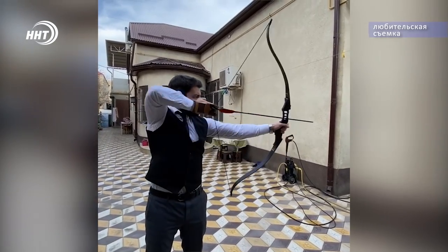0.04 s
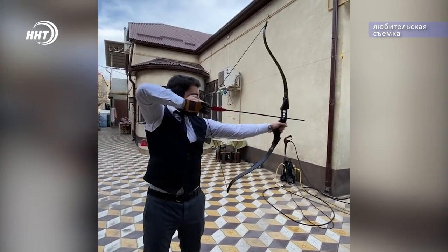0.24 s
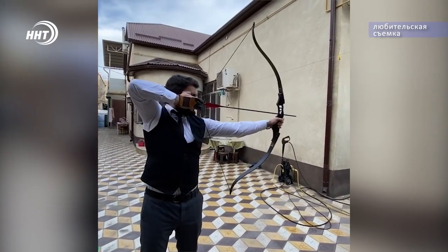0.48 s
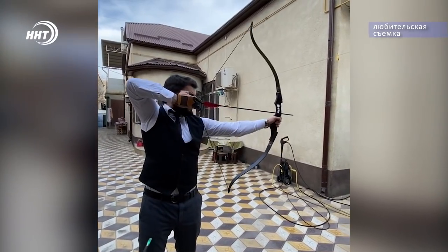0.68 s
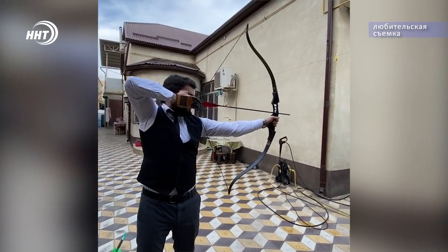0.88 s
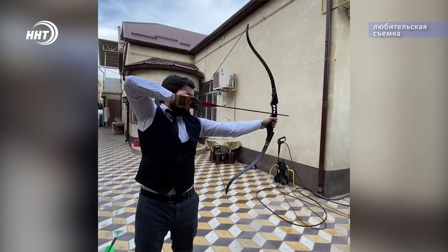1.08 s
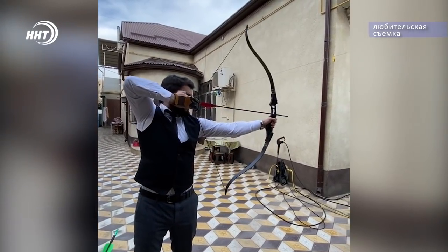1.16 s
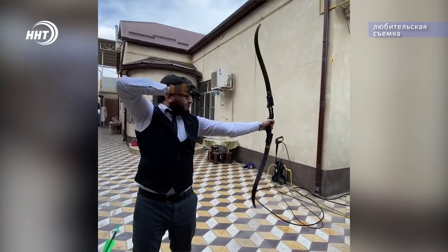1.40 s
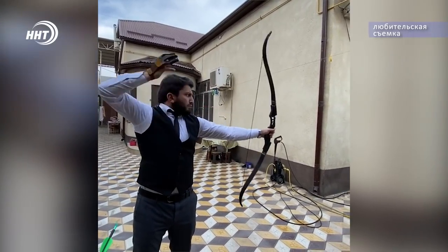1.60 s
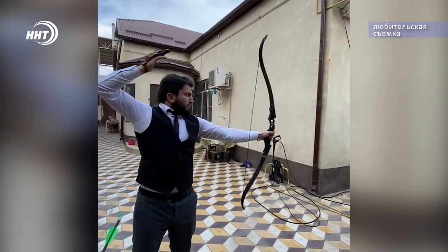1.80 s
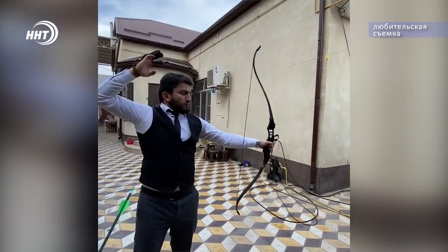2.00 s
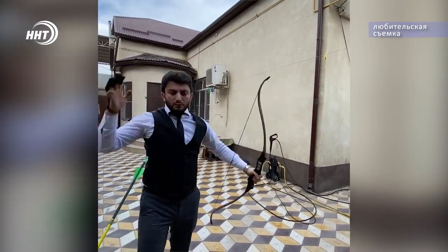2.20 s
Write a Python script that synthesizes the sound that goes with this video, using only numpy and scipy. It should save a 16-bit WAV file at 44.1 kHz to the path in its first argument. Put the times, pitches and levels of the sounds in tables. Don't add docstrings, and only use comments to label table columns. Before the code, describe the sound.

After a near-silent second of faint cloth rustle and tiny ticks, a bowstring hisses and slaps, an arrow knocks a hollow target, and walls throw it back over a low string hum; close microphone, paved yard.

```python
import sys
import numpy as np
from scipy import signal
from scipy.fft import rfft, irfft
from scipy.io import wavfile
from scipy.ndimage import uniform_filter1d

SR = 44100
rng = np.random.default_rng(int(sys.argv[2]) if len(sys.argv) > 2 else 0)


def master(y):
    cut = np.clip(np.atleast_2d(y).T, -1, 1)
    pcm = np.round(cut * 32767)
    wavfile.write(sys.argv[1], SR, pcm.astype(np.int16))


def volts(x):
    e = np.asarray(x, float) / 20
    return 10 ** e


N = 99180
T = np.arange(N) / SR
SIDE = np.array([[.5], [-.5]])
STRIKE_S = 1.3574


def evened(x):
    return x / np.sqrt(np.mean(x ** 2) + 1e-20)


def smooth(x, size):
    return uniform_filter1d(x, size=size)


def read(points, hz):
    f, value = np.transpose(points)
    return np.interp(np.log(hz + 1), np.log(f + 1), value)


def level(points):
    s, db = np.transpose(points)
    return volts(np.interp(T, s, db, left=-140, right=-140))


def resonate(x, hz, width_hz):
    turn = np.exp(2j * np.pi * hz * np.arange(x.shape[-1]) / SR)
    r = np.exp(-np.pi * width_hz / SR)
    return 2 * (turn * signal.lfilter([(1 - r) ** 2], [1, -2 * r, r * r], x / turn)).real


# pitch_hz, correlation
LIKENESS = [(60, 0.92), (250, 0.81), (600, 0.052), (1500, 0.59), (2300, -0.0014), (3200, -0.38),
            (8500, 0.13), (10500, 0.37), (13500, 0.12)]
# pitch_hz, left_minus_right_db
BALANCE = [(110, 0), (250, -6), (600, 2), (2000, -3.5), (4500, 5), (11000, -2.5)]


def paired(z, other, hz):
    same = np.clip(read(LIKENESS, hz), -1, 1)[:, None]
    half = volts(read(BALANCE, hz) / 2)[:, None]
    right = same * z + np.sqrt(1 - same ** 2) * other
    return np.array([half * z, right / half])


def hiss(tone, patchy_db):
    frames, hz = N // 128 + 5, np.fft.rfftfreq(512, 1 / SR)
    a, b, c, d, patch = rng.standard_normal((frames, 257, 5)).T
    patch = uniform_filter1d(patch, size=8, axis=0)
    patch = evened(uniform_filter1d(patch, size=12, axis=1))
    gain = volts(read(tone, hz)[:, None] + patchy_db * patch)
    z = paired(a + 1j * b, c + 1j * d, hz) * gain
    return evened(signal.istft(z, nperseg=512, noverlap=384)[1][:, :N])


def strike(hits, modes):
    out, t = np.zeros((2, N)), T[:SR // 2]
    for s, db in hits:
        at = round(s * SR)
        chances = 2 * rng.standard_normal((len(modes), 2))
        for (hz, mode_db, t60, pan_db, lead), (chance_db, chance_pan_db) in zip(modes, chances):
            lean_db = SIDE * (pan_db + chance_pan_db)
            fade = volts(db + mode_db + chance_db + lean_db - 60 * t / t60)
            ring = np.sin(2 * np.pi * hz * t + SIDE * lead)
            out[:, at:at + len(t)] += np.minimum(t * hz, 1) * fade * ring
    return out


def chirp(rows, pan_db):
    out = np.zeros((2, N))
    for s, length, hz, glide, db in rows:
        u = np.clip((T - s) / length, 0, 1)
        lean = volts(db + pan_db * (hz > 1000) * SIDE)
        cycles = length * hz * u * (1 + (glide - 1) * u / 2)
        out += lean * np.sin(np.pi * u) * np.sin(2 * np.pi * cycles)
    return out


# start_s, level_db
STRING_RUSH = [
    (1.168, -40),
    (1.1705, -30),
    (1.178, -32),
    (1.197, -26),
    (1.205, -17.5),
    (1.225, -16.5),
    (1.245, -26),
    (1.3, -35.5),
    (1.35, -63),
]
# pitch_hz, density_db_per_hz
STRING_TONE = [(180, -49.5), (300, -8.5), (492, -9), (553, -22.5), (744, -5.5), (1090, -6.5), (3280, -3.5),
               (10800, -19), (15500, -27.5)]
# start_s, level_db
STRING_SLAPS = [
    (1.2045, -16.5),
    (1.2095, -33.5),
    (1.2165, -14.5),
    (1.2215, -13),
    (1.235, -38.5),
    (1.253, -33),
    (1.268, -33),
]
# pitch_hz, level_db, t60_s, left_minus_right_db, left_lead_rad
BOW_MODES = [(196, -2.5, 0.09, -0.5, 0.6), (275.2, 1, 0.11, -7.5, 0.9), (494, 0.5, 0.15, 1, 5),
             (632, -8.5, 0.054, -2, -0.5), (747, -3.5, 0.095, 3.5, 1), (989, -7.5, 0.085, -1.5, 1.5),
             (1622, -12, 0.13, 0.5, 2), (2130, -4, 0.088, -8.5, 2), (2770, -14, 0.0067, 6, 6),
             (5850, -25.5, 0.18, -1.5, -3)]
# start_s, length_s, pitch_hz, glide_ratio, level_db
NOCK_TONES = [
    (1.198, .008, 3230, 1.02, -15),
    (1.2035, .016, 245, .95, -16),
    (1.262, .03, 115, .95, -32),
    (1.235, .07, 155, .95, -27),
    (1.271, .009, 265, .95, -19),
    (1.297, .01, 250, .95, -24),
    (1.316, .012, 220, .95, -29),
    (1.332, .012, 215, .95, -27),
    (1.235, .03, 1630, 1, -29),
]


def bow():
    grain = volts(3.15 * evened(smooth(rng.standard_normal(N), 60)))
    rush = level(STRING_RUSH) * grain * hiss(STRING_TONE, 3.0)
    return rush + strike(STRING_SLAPS, BOW_MODES) + chirp(NOCK_TONES, pan_db=-6)


# start_s, swell_s, pitch_hz, level_db, t60_s
STRING_HUM = [
    (1.215, 0.0043, 108, -26.5, 0.7),
    (1.43, 0.21, 219.5, -17.5, 0.81),
    (1.5, 0.015, 200, -27.5, 0.37),
    (1.4, 0.19, 111.2, -33.5, 1.65),
]


def hum():
    out = np.zeros(N)
    waver_depth_db, drift_rad = 2., .3
    for s, swell, hz, db, t60 in STRING_HUM:
        t = np.maximum(T - s, 0)
        waver, drift = (evened(smooth(smooth(v, 700), 700)) for v in rng.standard_normal((N, 2)).T)
        gain = volts(db + waver_depth_db * waver * hz / 220 - 60 * t / t60)
        phase = 2 * np.pi * hz * t + drift_rad * (hz / 220) ** 2 * drift
        out += np.minimum(t / swell, 1) * gain * np.sin(phase)
    return out * volts([[-1.5], [1.5]])


# start_s, level_db
ARROW_KNOCKS = [
    (1.3574, -10),
    (1.3605, -23),
    (1.3665, -9.5),
    (1.3695, -15),
    (1.375, -15.5),
]
# pitch_hz, level_db, t60_s, left_minus_right_db, left_lead_rad
TARGET_MODES = [(571.6, -6, 0.058, -4.5, 1.37), (828, 3.5, 0.025, 15.5, 4.5), (724, -2.5, 0.033, -4.5, 0.5),
                (884, -1.5, 0.11, -1, -1.35), (1343.4, -9, 0.075, 2, 0.4), (1783, 7.5, 0.011, 9.5, 2.5),
                (2043, -4, 0.11, -6, 2.32), (2100, -10, 0.065, -19, 1.84), (4300, -22, 0.072, 8, 5),
                (5370, -32.5, 0.019, 6.5, -7.5)]
# start_s, length_s, pitch_hz, glide_ratio, level_db
SHAFT_TONES = [
    (1.3572, .008, 1750, 1.25, -15),
    (1.361, .012, 2800, 1.23, -17),
    (1.3625, .013, 200, .95, -11),
    (1.361, .02, 107, .98, -22),
]
# pitch_hz, density_db_per_hz
CRACK_SPECTRUM = [(150, -47), (250, -24.5), (658, -17.5), (837, 2.5), (1070, -14), (2060, -11.5),
                  (7130, -28), (15500, -60)]


def arrow():
    t = T - STRIKE_S
    crack_db, crack_s, fall_db_per_s = -15, .014, 1200
    fade = volts(crack_db - fall_db_per_s * np.maximum(t - crack_s, 0))
    crack = (t > 0) * fade * hiss(CRACK_SPECTRUM, 0.97)
    return strike(ARROW_KNOCKS, TARGET_MODES) + chirp(SHAFT_TONES, pan_db=8.5) + crack, crack


# start_s, level_db
ECHO_LEVEL = [(1.385, -25), (1.41, -29.5), (1.425, -24), (1.468, -28.5), (1.498, -43), (1.515, -32),
              (1.54, -33), (1.65, -39), (2.15, -70)]
# pitch_hz, density_db_per_hz
ECHO_SPECTRUM = [(150, -38), (250, -15.5), (423, -12.5), (606, -9.5), (663, -25), (894, 0.5), (1070, -18.5),
                 (1760, -11), (9000, -45), (11700, -80.5), (19800, -120)]
# pitch_hz, width_hz, level_db
ECHO_MODES = [(549, 92, -11.5), (850, 76, -7.5), (1330, 110, -8), (1727, 300, -8.5), (2083, 200, -9.5)]


def echo():
    wash, white = hiss(ECHO_SPECTRUM, 3.), hiss([(20, 0), (20000, 0)], 2.)
    high_pass = signal.butter(2, 2600, "high", fs=SR, output="sos")
    treble = signal.sosfiltfilt(high_pass, wash)
    dulling_db_per_s = 25.5
    dull = volts(-dulling_db_per_s * np.maximum(T - STRIKE_S, 0))
    rings = sum(volts(db) * evened(resonate(white, hz, width_hz)) for hz, width_hz, db in ECHO_MODES)
    grain = volts(1.5 * evened(smooth(rng.standard_normal(N), 120)))
    return volts(-2.5) * level(ECHO_LEVEL) * grain * (wash - (1 - dull) * treble + rings)


# delay_s, level_db over the tail's start
WALL_RETURNS = [
    (.064, -7),
    (.097, -3),
    (.155, -7),
    (.22, -10),
]
# pitch_hz, t60_s
YARD_DECAY = [(100, 1), (250, 1), (900, 0.9), (2000, 0.61), (4000, 0.82), (8000, 0.38), (14000, 0.24)]
# pitch_hz, level_db
YARD_COLOR = [(100, -6), (330, -2.5), (900, -5.5), (1400, 2), (2000, 0.5), (5000, -5), (12000, 7.5)]


def yard(x):
    taps = np.zeros((2, SR))
    at = np.arange(400, SR - 20, 20) + rng.integers(0, 20, (2, (SR - 401) // 20))
    np.put_along_axis(taps, at, rng.standard_normal(at.shape) ** 3, 1)
    hz, t, z = signal.stft(taps, SR, nperseg=256)
    shape = volts(-60 * t / read(YARD_DECAY, hz)[:, None])
    for delay, db in WALL_RETURNS:
        smear_db = -1200 * np.maximum(t - delay, 0)
        air_loss_db = 4.5 * hz[:, None] / 1000
        shape = shape + (t >= delay) * volts(db + smear_db - air_loss_db)
    z = paired(*z, hz) * shape * volts(read(YARD_COLOR, hz))[:, None]
    tail = signal.istft(z, SR, nperseg=256)[1]
    return signal.fftconvolve(x[None], evened(tail) / np.sqrt(SR), axes=1)[:, :N]


# start_s, length_s, pitch_hz, width_hz, level_db
SMALL_TICKS = [(.305, .045, 790, 200, -55), (.311, .01, 6300, 1800, -59), (.475, .06, 3900, 600, -59),
               (.522, .045, 2200, 500, -51), (.615, .045, 5000, 350, -60), (.685, .06, 3650, 250, -65),
               (1.895, .004, 11800, 1800, -46), (1.2, .12, 14700, 500, -21), (1.357, .005, 14700, 900, -14),
               (1.895, .008, 14700, 900, -24), (1.9, .003, 12000, 2000, -50), (.27, .005, 10000, 4000, -62),
               (1.3574, .014, 8000, 7000, -33), (.705, .008, 9500, 3000, -62), (1.97, .015, 900, 300, -57),
               (1.875, .004, 11000, 3000, -60), (.508, .006, 8500, 4000, -59),
               (.533, .004, 11000, 3000, -57), (.585, .03, 5000, 300, -61), (.34, .005, 10500, 4000, -65),
               (1.81, .006, 11000, 2500, -65), (.92, .004, 11000, 3000, -72), (.678, .006, 9000, 4000, -64),
               (1.2195, .004, 11000, 2500, -34), (1.157, .005, 8000, 6000, -57),
               (1.181, .004, 8000, 5000, -42), (1.17, .004, 9000, 3000, -36)]


def ticks():
    out = np.zeros((2, N))
    for s, length, hz, width_hz, db in SMALL_TICKS:
        u = (T - s) / length
        noise = rng.standard_normal((N, 2)).T * [[1], [.5]]
        ring = evened(resonate(np.cumsum(noise, 0), hz, width_hz))
        out += volts(db) * (u > 0) * np.exp(-(2 * u - .5) ** 2) * ring
    return out


# start_s, level_db
AIMING_CLOTH = [(0.0, -61.5), (0.15, -56.5), (0.27, -61.5), (0.406, -66.5), (0.5, -55.5), (0.536, -45),
                (0.56, -50.5), (0.63, -57), (0.676, -67), (0.714, -54), (0.74, -70), (0.922, -77),
                (0.954, -67.5), (1.0, -108)]
# start_s, level_db
LOWERING_CLOTH = [(1.8, -76), (1.888, -63), (1.896, -68), (1.908, -58), (1.95, -59), (1.99, -53.5),
                  (2.02, -60), (2.12, -63.5), (2.224, -68), (2.249, -65)]
# pitch_hz, density_db_per_hz
CLOTH_SPECTRUM = [(290, -58), (500, -30), (777, -27), (1020, -12), (1530, -25), (1730, -2), (2160, -4),
                  (10500, -12), (13500, -19.5)]
# start_s, level_db
SCUFF_LEVEL = [(0, -46), (.05, -50.5), (.27, -68.5), (.3, -76)]
# pitch_hz, density_db_per_hz
SCUFF_SPECTRUM = [(200, -11), (750, -2.5), (1500, -3.5), (3600, -4), (6000, -10.5), (8000, -24)]


def rustle():
    sleeve = (level(AIMING_CLOTH) + level(LOWERING_CLOTH)) * hiss(CLOTH_SPECTRUM, 2.2)
    return sleeve + level(SCUFF_LEVEL) * hiss(SCUFF_SPECTRUM, 2.5)


# start_s, level_db
INSECT_LEVEL = [(0, -71.5), (1.15, -72.5), (1.599, -76), (1.9, -59.5), (2.25, -64.5)]
# pitch_hz, density_db_per_hz
QUIET_SPECTRUM = [(12, -61.5), (20, -25), (64, -4.5), (223, -21.5), (384, -18), (451, -23), (1610, -25.5),
                  (2000, -33.5), (13000, -62.5)]


def air():
    chirr = resonate(hiss([(20, 0), (20000, 0.004)], 1.1), hz=4450, width_hz=900)
    whine = resonate(rng.standard_normal((N, 2)).T, hz=5780, width_hz=130)
    quiet = volts(-55) * hiss(QUIET_SPECTRUM, 1.8)
    return quiet + level(INSECT_LEVEL) * evened(chirr) + volts(-83) * evened(whine)


def scene():
    shot, (hit, crack) = bow(), arrow()
    shot_wet_db, hit_wet_db, crack_wet_db = -5, -10, -2
    sent = volts(shot_wet_db) * shot + volts(hit_wet_db) * hit + volts(crack_wet_db) * crack
    wet = yard(sent.mean(0))
    return shot + hit + hum() + wet + echo() + ticks() + rustle() + air()


def low_pass(x):
    return signal.sosfilt(signal.butter(12, 16300, fs=SR, output="sos"), x)


# pitch_hz, level_db
TREBLE_EDGE = [(12300, 0), (13000, -32), (14000, -32), (14300, -32), (15200, -32), (15900, -60)]


def record(dry):
    dip_s, fade_out_s, fade_in_s = 2.207, .03, .025
    dip = np.maximum((dip_s - T) / fade_out_s, (T - dip_s) / fade_in_s)
    limited = np.tanh(dry / 1.586) * 1.39 * np.clip(dip, .03, 1)
    shelf = volts(read(TREBLE_EDGE, np.fft.rfftfreq(N, 1 / SR)))
    return low_pass(irfft(rfft(limited) * shelf, N))


dry = scene()
out = record(dry)
master(out)
```